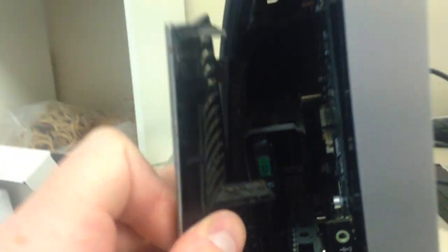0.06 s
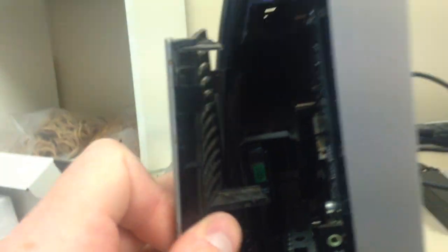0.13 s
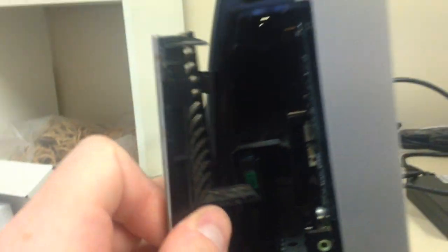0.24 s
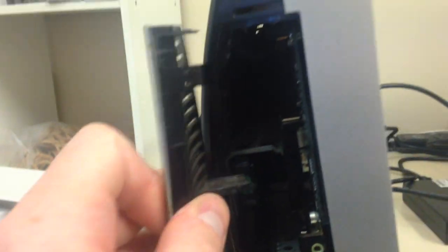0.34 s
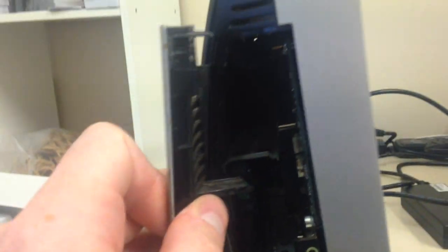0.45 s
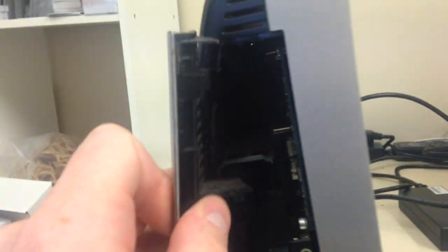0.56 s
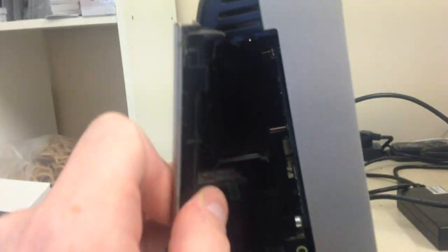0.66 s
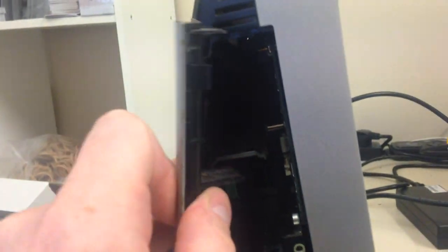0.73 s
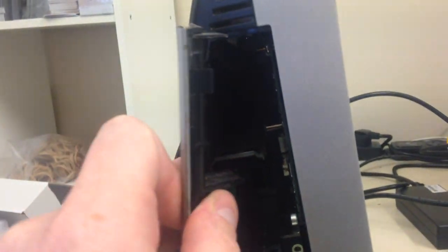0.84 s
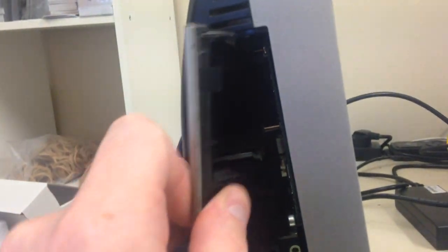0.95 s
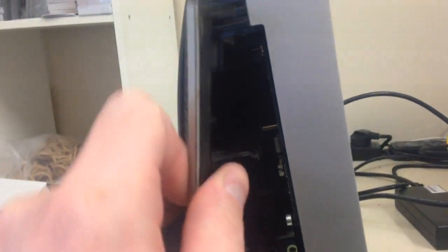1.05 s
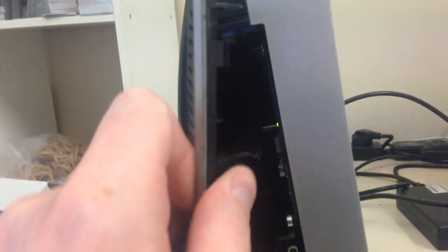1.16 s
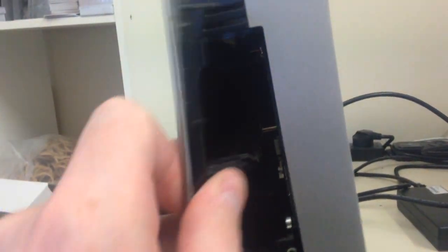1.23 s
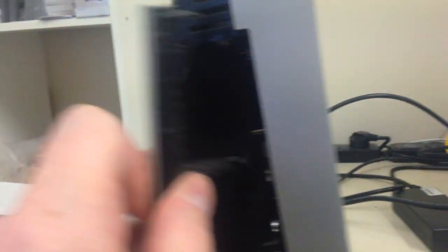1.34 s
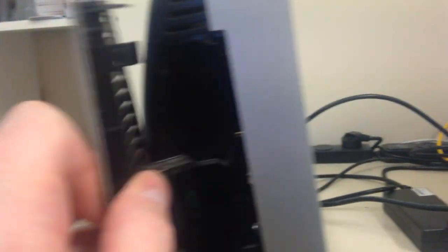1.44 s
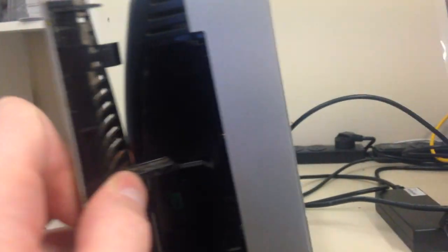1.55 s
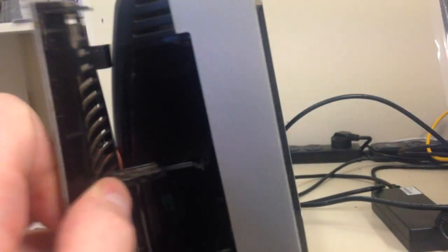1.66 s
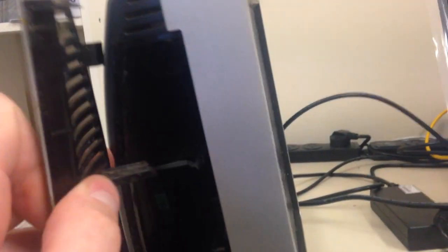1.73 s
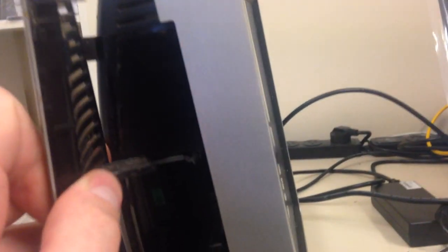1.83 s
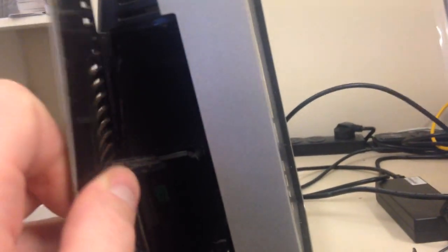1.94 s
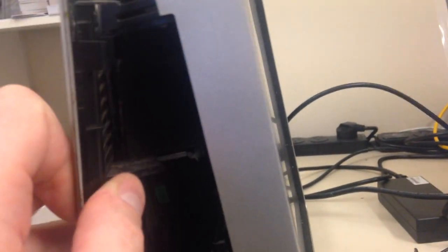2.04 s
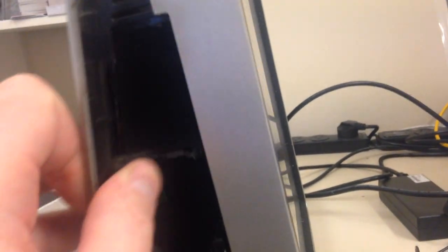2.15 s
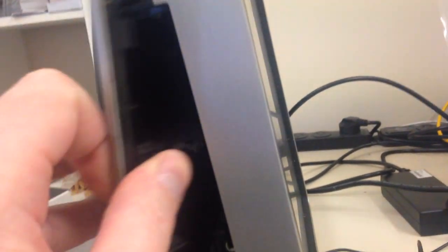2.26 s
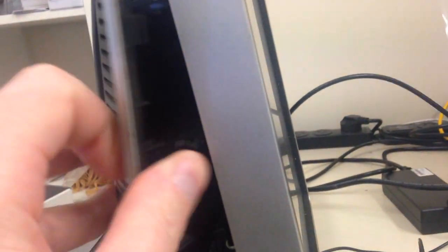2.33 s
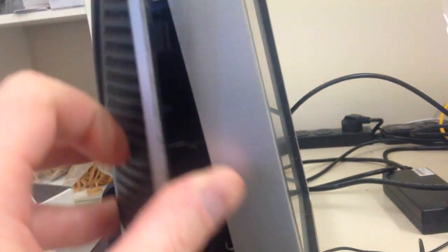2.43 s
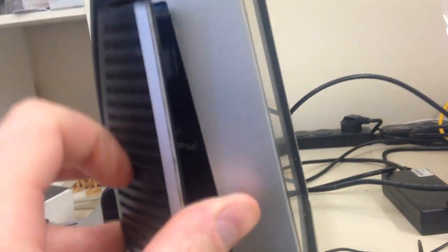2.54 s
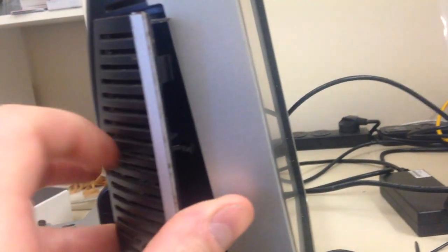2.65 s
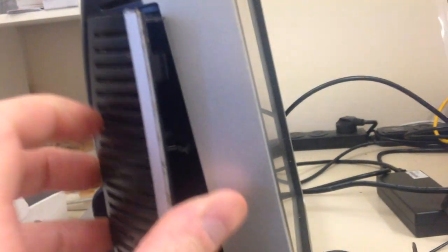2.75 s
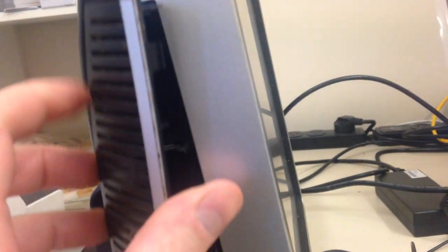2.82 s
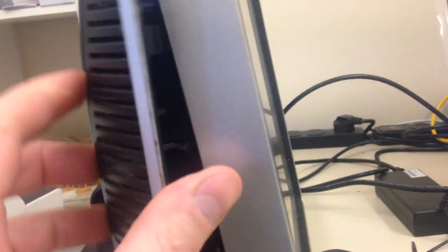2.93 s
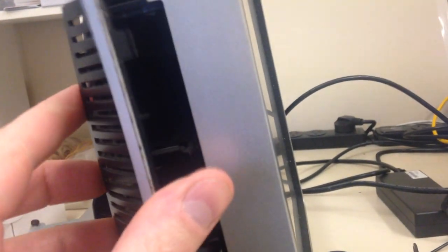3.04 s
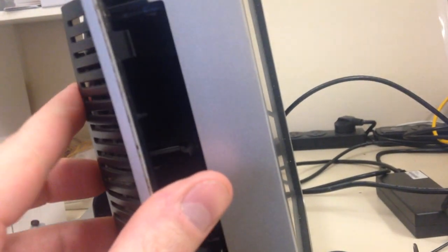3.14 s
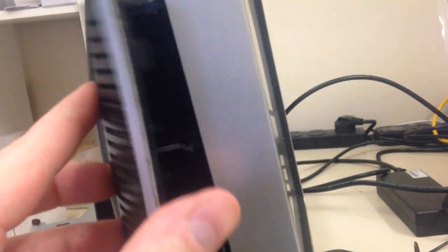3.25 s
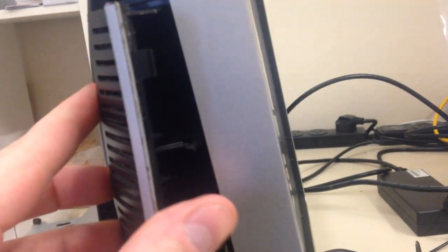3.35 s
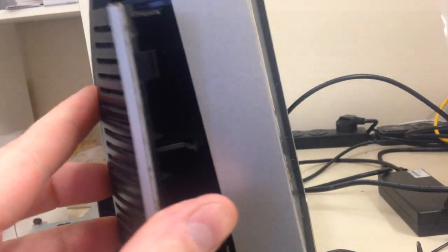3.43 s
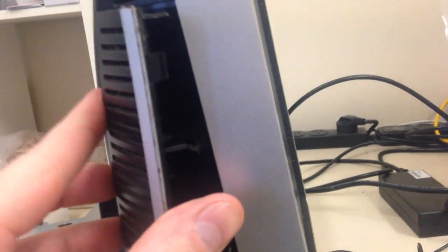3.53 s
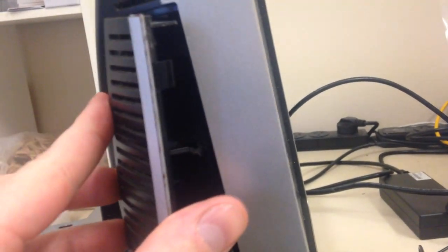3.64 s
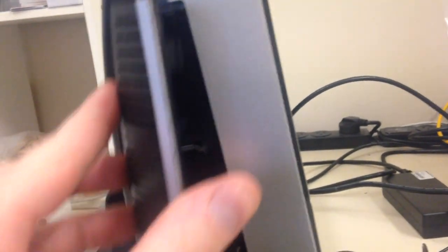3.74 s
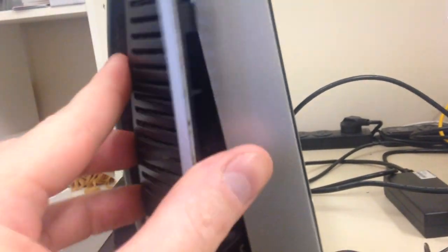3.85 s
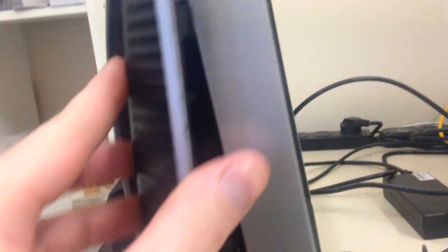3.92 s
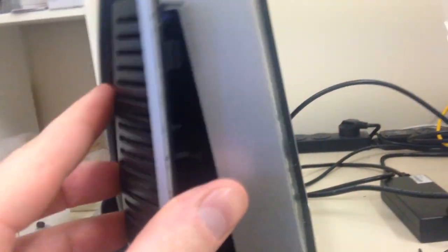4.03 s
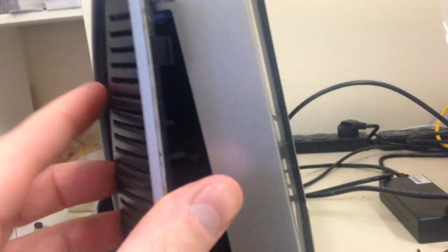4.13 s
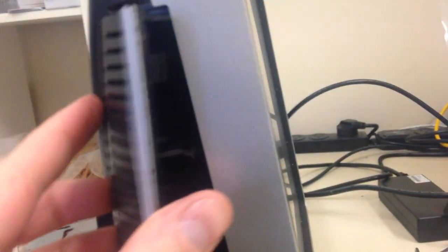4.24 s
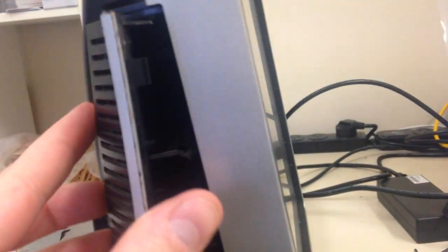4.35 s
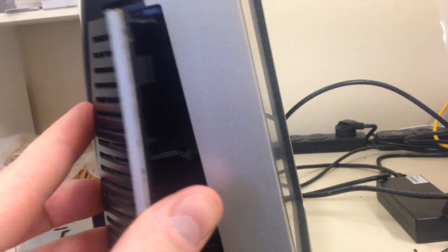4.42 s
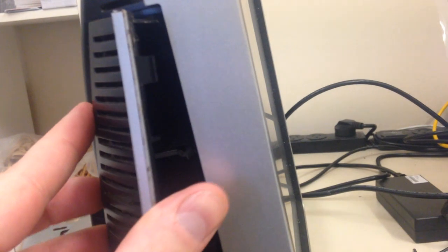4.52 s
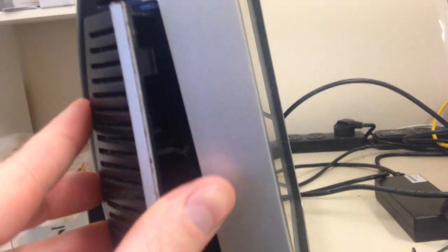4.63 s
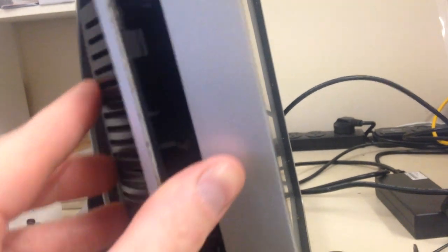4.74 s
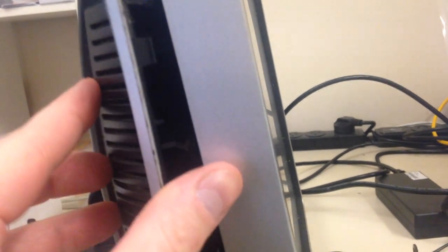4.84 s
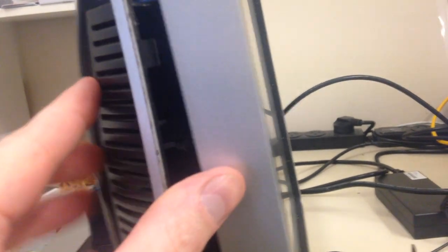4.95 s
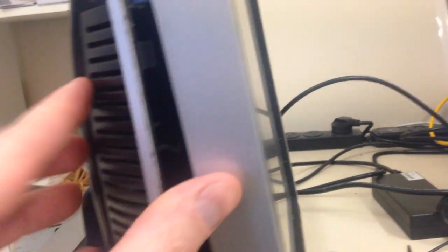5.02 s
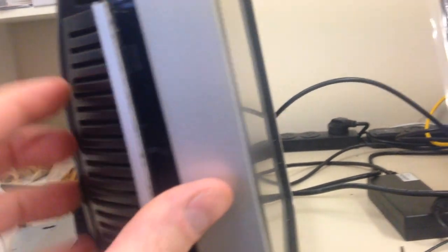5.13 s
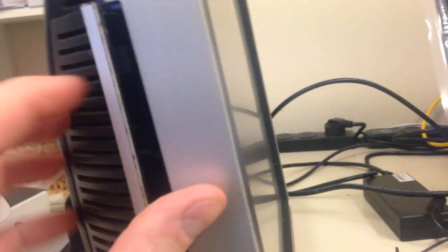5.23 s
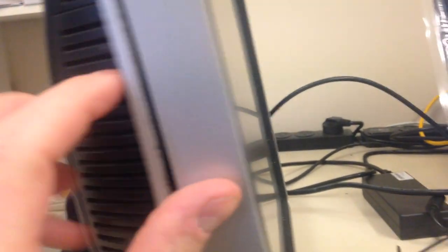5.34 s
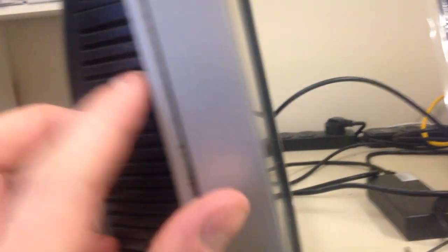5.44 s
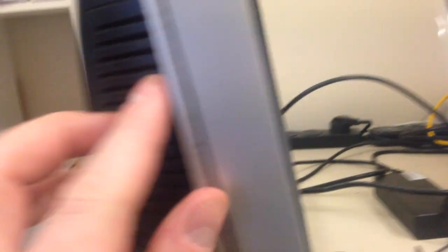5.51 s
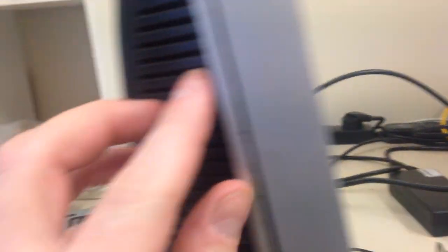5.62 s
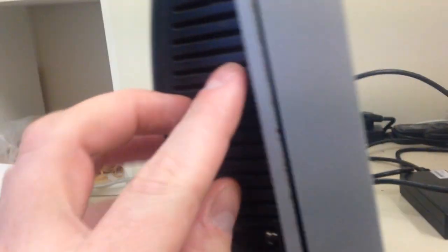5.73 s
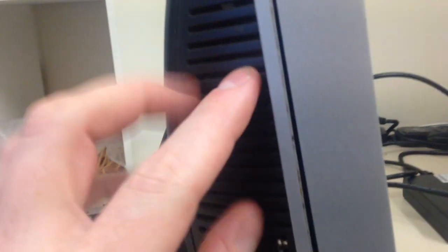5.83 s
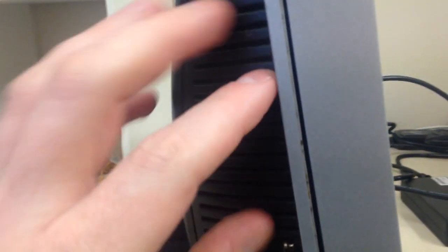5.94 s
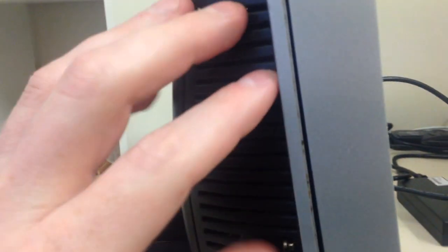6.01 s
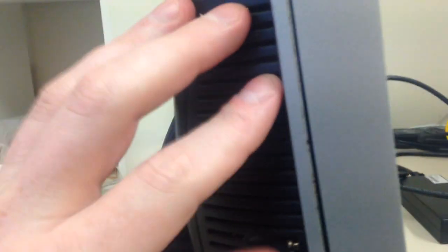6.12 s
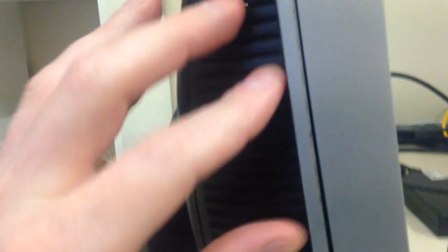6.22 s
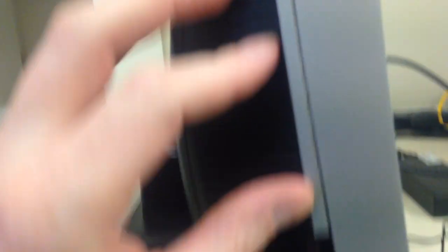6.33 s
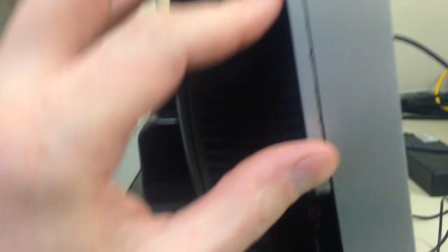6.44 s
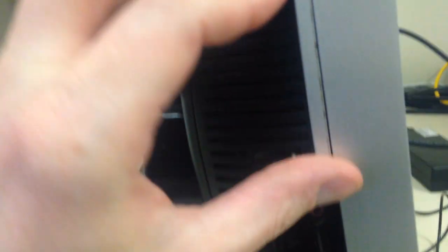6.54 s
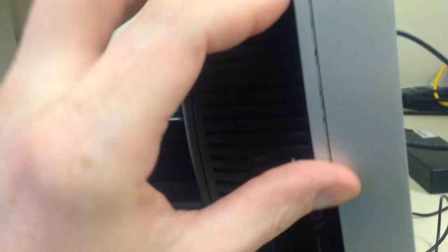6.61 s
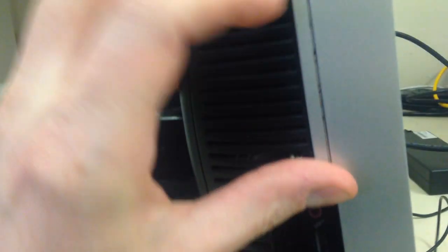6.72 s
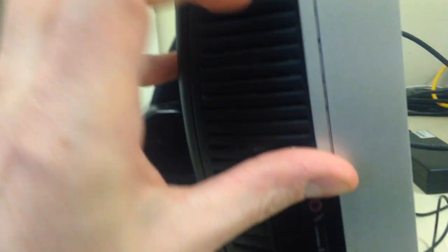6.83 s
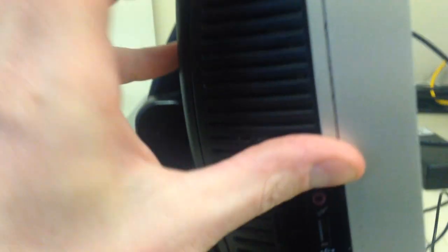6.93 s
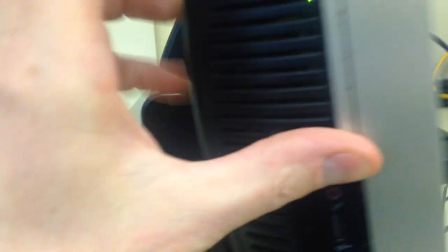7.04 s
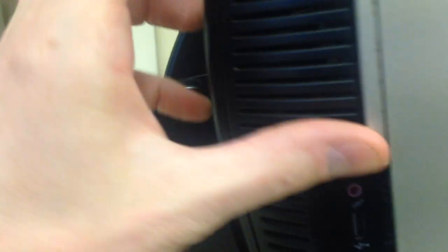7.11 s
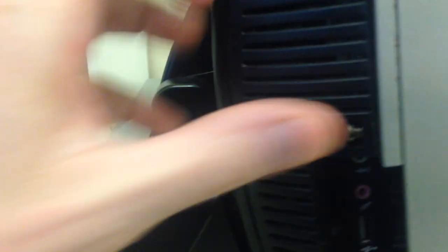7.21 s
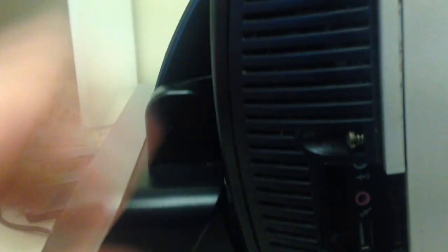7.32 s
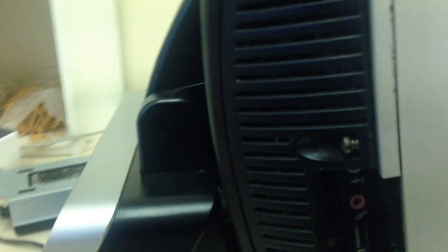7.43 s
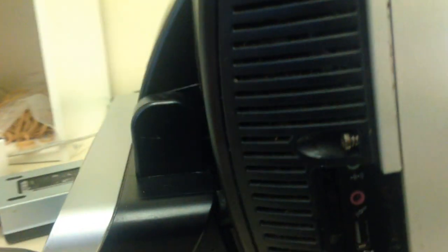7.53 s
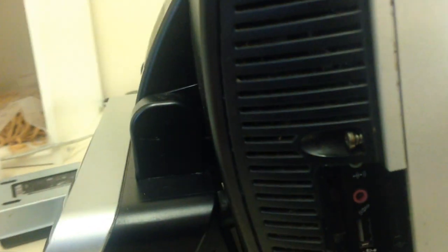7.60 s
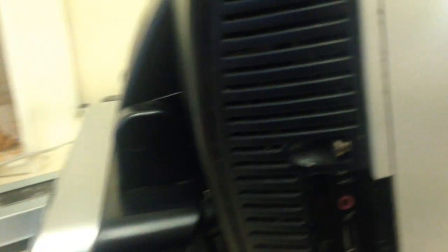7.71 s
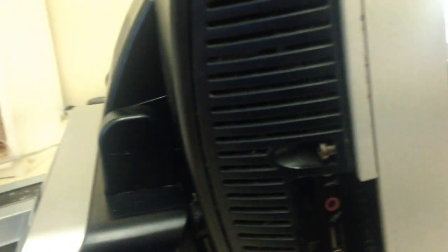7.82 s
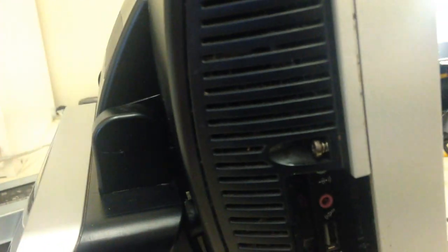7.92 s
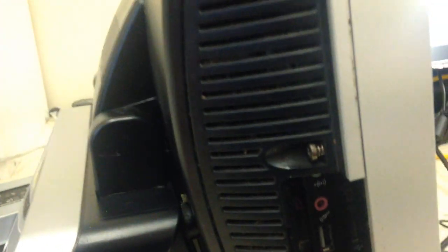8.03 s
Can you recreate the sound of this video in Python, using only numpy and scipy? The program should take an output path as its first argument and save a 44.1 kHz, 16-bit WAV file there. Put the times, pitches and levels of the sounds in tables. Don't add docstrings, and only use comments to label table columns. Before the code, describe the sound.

A light plastic cover is turned, tapped and scraped along the edge of a hollow casing, irregularly, with hollow pocketed clacks and dry skin rubbing. After a sparse, quieter middle, it is pushed in with a strong crack, then crunchy clicks and low casing thumps, a second strong crack, and a few last clicks before it goes quiet. Close handheld microphone, quiet indoor room, slightly reverberant, steady faint fan hum behind.

```python
import sys
import numpy as np
from scipy import signal
from scipy.fft import rfft, irfft, next_fast_len
from scipy.io import wavfile
from scipy.ndimage import uniform_filter1d, map_coordinates

SR = 44100
rng = np.random.default_rng(int(sys.argv[2]) if len(sys.argv) > 2 else 0)


def wrap_up_sound(samples):
    columns = np.atleast_2d(samples).T
    tamed = np.clip(columns, -1, 1)
    steps = np.round(tamed * 32767).astype(np.int16)
    wavfile.write(sys.argv[1], SR, steps)


def nominal_scale(level):
    x = np.asarray(level, float) / 20
    return 10 ** x


N = 355887
HIT = 8192
SEATED_S = 4.2

# shaft_order, level_db, second_motor_share
FAN_HUM = [(1, -57, 0.67), (2, -70, 0.1), (4, -70.5, 0.88)]
# frequency_hz, density_db_per_hz
AIR_NOISE = [(15, -13), (30, -31.5), (62, -21.5), (85, -5.5), (120, -12.5), (250, -24.5), (450, -29),
             (800, -27.5), (1500, -35.5), (3000, -41.5), (5000, -47), (10400, -48), (16000, -51.5)]
# frequency_hz, t60_s
ROOM_DECAY = [(150, 0.51), (1000, 0.5), (4000, 0.33), (12000, 0.23)]
# frequency_hz, gain_db
TO_WALLS = [(550, 1.5), (850, -5.5), (1450, -2), (2500, -3)]
# frequency_hz, gain_db
FAR_THUD = [(250, -34.5), (450, 5.5), (800, 1.5), (2200, -10), (2600, -41)]
# frequency_hz, gain_db
MIC_BAND = [(30, -12), (42, 0), (15250, 0), (15500, -16), (16100, -20), (16500, -90)]

# frequency_hz, width_hz, level_db
PANEL_MODES = [(1280, 20, 0.5), (1470, 19.3, 10), (1770, 81, -8.5), (2029, 27, 7), (2783, 86, -3.5),
               (3076, 54, 7), (3580, 92, -23), (4290, 42, -7), (5240, 110, -13.5), (5890, 30, -4),
               (7630, 33, -14.5)]
# frequency_hz, width_hz, level_db
OPEN_POCKET = [(700, 34, -8), (810, 40, -2), (885, 33, 0)]
# frequency_hz, width_hz, level_db
SHUT_POCKET = [(730, 70, -9), (810, 42, 0), (880, 70, -9)]
# frequency_hz, gain_db
CONTACT_EDGE = [(90, -25.5), (350, -9), (1200, 5), (3000, -2), (5000, -11), (9000, -48.5)]
# frequency_hz, density_db_per_hz
FIZZ = [(2350, -29), (4000, 5.5), (4710, 1), (6040, 4), (13100, -10), (15200, -11), (16000, -30.5)]
# frequency_hz, gain_db
CASING = [(45, -22.5), (90, -7), (200, 6.5), (320, 5), (480, 3), (700, -44.5)]

# time_s, pressure_db, speed_db (as extra fizz)
FINGERS = [(0.0, -66.5, -14), (0.29, -64, -19), (0.76, -74.5, -29), (1.3, -64.5, -21), (1.65, -77, -20),
           (2.49, -70, -8), (2.6, -68.5, -8), (3.14, -73.5, 4), (3.37, -71.5, -11.5), (4.79, -76.5, -5),
           (4.95, -86, -17), (5.21, -76.5, 0), (5.45, -64.5, -16), (5.8, -75.5, -5.5), (6.9, -72, -4.5),
           (7.21, -69.5, -4.5), (7.46, -80, -3), (8.07, -81.5, -16)]
# peak_s, level_db, rise_ms (20 dB), fall_ms (20 dB), brightness_db
SCRAPES = [(0.12, -58, 79, 32, -21.5), (0.482, -51, 120, 47, -21), (0.696, -58.5, 12, 120, -5),
           (1.189, -54, 130, 21, -8), (1.311, -26.5, 22, 12, -12.5), (1.35, -44.5, 3, 87, -21),
           (2.073, -42.5, 11, 29, -23), (2.625, -42, 31, 53, -7), (3.102, -49.5, 83, 16, 1),
           (3.929, -54, 106, 77, -6), (4.08, -59.5, 109, 63, -0.5), (4.783, -46, 11, 24.5, -4.5),
           (4.846, -31, 39.5, 16, -22), (4.929, -30, 4, 6, -8.5), (4.94, -49.5, 2, 90.5, -14.5),
           (5.197, -45.5, 19.5, 1, -15), (5.398, -39, 5, 40, -20), (5.951, -39.5, 11, 14, -11),
           (6.42, -29.5, 3, 13, -7), (6.428, -36, 13, 72, -13), (6.821, -48.5, 18, 92, -9)]
# start_s, length_ms, level_db, pocket_db, brightness_db
DRAGS = [(0.06, 35, -74.5, 24, -14), (2.86, 130, -79, 14, -9), (3.07, 56, -51, 7.5, -9),
         (1.402, 3.9, -67, 1, 7.5), (1.441, 60, -66, 18, -9), (2.429, 146, -72, 3, 0.5),
         (2.721, 103, -69.5, -16, -4), (4.288, 61, -70.5, -8, 1), (4.468, 62, -68.5, 2, -1),
         (2.43, 64, -79, -10, 2.5), (7.44, 28, -68, -16.5, -4)]
# start_s, peak_db, pitch_hz, t60_ms
SLIPS = [(4.7797, -39.5, 7000, 28), (4.787, -39, 6950, 15), (4.807, -42, 9500, 20), (4.816, -46, 11000, 20),
         (4.826, -44, 10000, 16), (4.8352, -30, 11000, 14), (4.8432, -34.5, 6200, 14),
         (4.953, -43, 8000, 14), (4.967, -43, 7200, 12), (1.286, -38, 2800, 30), (1.2987, -34, 11000, 15),
         (1.3, -26.5, 3100, 39), (1.305, -36, 9000, 10), (1.313, -32, 3300, 34), (1.328, -47, 5200, 10),
         (1.393, -50, 8500, 10), (5.1803, -57, 11000, 12), (5.189, -54, 10000, 13), (5.412, -39, 7300, 15),
         (5.444, -42, 9000, 12), (5.4566, -32.5, 13000, 15), (5.5055, -34, 13500, 18),
         (5.524, -42, 10600, 11), (5.532, -38, 3800, 13), (6.4235, -32, 9500, 12), (6.451, -44, 10000, 15),
         (3.905, -51, 9000, 20), (4.0564, -63, 8600, 18), (4.2938, -65, 8100, 15), (2.5794, -51, 6000, 30),
         (2.966, -54, 5900, 40), (3.0264, -56, 6800, 30), (3.3447, -54, 6200, 18), (6.798, -59, 6000, 9.1),
         (6.828, -42, 3600, 18), (4.9315, -21, 1600, 41), (6.4225, -20.5, 1340, 68), (6.449, -28, 1560, 60),
         (4.3976, -32, 11700, 15), (1.309, -25, 14000, 40), (1.7448, -32, 12500, 17),
         (6.128, -34, 12000, 15), (6.064, -51, 1300, 25), (6.096, -51, 1300, 25), (3.025, -51, 2200, 46),
         (1.2, -54, 4600, 15), (4.846, -37, 15000, 20), (6.1, -59, 9000, 12), (2.315, -55, 2000, 30),
         (4.812, -39, 1500, 60),
         (6.743, -29.5, 1440, 25),
    (6.1285, -27.5, 1280, 20),
    (6.926, -34.5, 1860, 30),
    (3.1, -42, 1400, 30),
    (3.928, -46, 2900, 30),
    (4.7, -42, 2560, 33),
]

# start_s, peak_db, pitch_hz
KNOCKS = [(1.174, -45, 257), (1.248, -36.5, 410), (2.035, -47, 325), (3.499, -46.5, 380), (3.949, -40, 298),
          (4.398, -40, 440), (4.515, -44.5, 317), (4.783, -40, 372), (4.846, -25, 423), (4.931, -34, 404),
          (5.193, -35.5, 380), (5.365, -31.5, 377), (5.421, -33, 358), (5.455, -37, 360), (5.947, -41, 457),
          (6.131, -32, 417), (6.311, -43.5, 450), (6.419, -27.5, 406), (6.741, -37.5, 450),
          (6.806, -37, 462), (6.855, -37, 555), (6.93, -31.5, 371), (7.053, -44.5, 390),
          (7.433, -48.5, 327)]
# start_s, peak_db, pitch_hz
ROCKS = [
    (4.933, -41, 131.5),
    (5.412, -44, 95),
    (6.416, -41.5, 180),
    (7.081, -41.5, 76.3),
]
# start_s, peak_db, pitch_hz
BUMPS = [
    (2.637, -43, 347),
    (4.02, -51, 172),
    (5.333, -50, 330),
    (6.378, -41.5, 450),
    (6.44, -30, 404),
    (7.1, -42.5, 406),
    (7.92, -53.5, 496),
    (6.891, -43.5, 750),
]

# start_s, peak_db, pocket_db, brightness_db
FACE_TAPS = [(0.1091, -32.5, -2.5, -17.5), (0.3923, -40.5, -8, -15), (0.4409, -44, 7, -9),
             (0.6983, -44, 6, -18), (0.8981, -27, -8, -14), (1.1345, -54, 18, 0), (1.2476, -25.5, -7, -11),
             (1.3671, -32, -0.5, -3.5), (1.5179, -44.5, -1.5, -24), (1.9973, -38, 0.5, -28),
             (2.6361, -33.5, 0.5, -12), (3.684, -34.5, -29, -13.5), (3.706, -35, -14, -16),
             (3.8801, -40.5, 1.5, -6)]
# start_s, peak_db, pocket_db, brightness_db
PRESSES = [(4.555, -39.5, -6.5, -20), (4.8084, -36, 5, -22), (4.847, -19.5, -2.5, -13),
           (5.1941, -24, 1, -15), (5.4205, -23, -6.5, -8), (5.502, -58, -22, 20),
           (5.5254, -28.5, -4.5, -9.5), (6.1281, -25.5, -3, -2), (6.2886, -37, -3, -8),
           (6.422, -10, -9.5, -4), (6.656, -50, -24, 0.5), (6.6765, -46, -28, -16.5),
           (6.8267, -42, -24, -18.5), (6.854, -30, -1, -3.5), (6.9253, -23, -3.5, -17),
           (6.9332, -20.5, -15, -14), (7.0575, -29.5, -12, -13.5)]
# start_s, peak_db, pocket_db, brightness_db
CLIPS = [(0.031, -34.5, -23, -7), (0.3336, -45, -6, -6), (0.4714, -57, 2, -14), (0.7622, -32.5, -7, -14.5),
         (1.2814, -36.5, 10, -19.5), (1.292, -21, -11, -22), (2.6162, -29, -4, -12),
         (3.548, -29.5, -10.5, -16.5), (4.9305, -7.5, -9, -15), (5.9529, -33.5, 1.5, -15),
         (6.3124, -34, -3, -18), (6.4704, -23, -24, -7), (6.7428, -23, -2.5, -19.5), (6.797, -46, 7, -18),
         (6.8065, -26.5, 3, -4), (7.0384, -41, -15, -14), (7.093, -40.5, -3, -6.5), (7.1351, -24, -4, 0.5),
         (7.436, -53.5, -16, 0)]
# start_s, peak_db, pocket_db, brightness_db
RIM_TICKS = [(0.4914, -46, 2, -6), (0.5681, -46.5, -19, -2), (1.0812, -45, -8, -6), (1.1783, -37, -7, -2.5),
             (1.3069, -25, -13, -11), (1.5519, -43, -1, -9), (1.7448, -22.5, -4.5, -6.5),
             (2.0356, -41.5, -2, -6.5), (2.144, -30, -5, -12), (2.238, -48.5, 0, -4),
             (3.0964, -22, -5, -44), (3.1574, -24, -5.5, -16.5), (3.3568, -41.5, -9, -3.5),
             (3.4996, -34.5, 0, -11), (3.9235, -35.5, -6, -2), (3.942, -30, -24, -12),
             (4.3047, -43, -36, -12.5), (4.3824, -47, -6, -10), (4.3972, -34.5, -5, 0),
             (4.467, -40, -11, -8.5), (5.3275, -34.5, -5.5, -3.5), (5.3647, -24, -19, -4),
             (5.395, -20.5, -34, -5), (5.4114, -18.5, -24, -24), (5.4583, -23, -10.5, -15),
             (6.5009, -23, 4, 0.5), (7.1253, -42, -27, 4)]
CORNER_TAPS = [
    .898,
    1.135,
    2.144,
    3.548,
]


def unit(x):
    return x / np.sqrt(np.mean(x ** 2, axis=-1, keepdims=True) + 1e-20)


def peak_one(x):
    return x / np.abs(x).max(axis=-1, keepdims=True)


def along(points, hz):
    f, v = np.transpose(points)
    return nominal_scale(np.interp(np.log(hz + 1), np.log(f + 1), v))


def wobble(rate):
    knots = rng.standard_normal(int(N * rate / SR) + 4)
    return map_coordinates(knots, [np.arange(N) * rate / SR])


def filtered(x, response):
    m = next_fast_len(x.shape[-1] + 2048)
    return irfft(rfft(x, m) * response(np.fft.rfftfreq(m, 1 / SR)), m)[..., :x.shape[-1]]


def modes(table, luck=np.zeros((1, 16, 2)), scatter_db=0, detune=0, damping=1):
    def response(f):
        total = 0
        for k, (centre, width, db) in enumerate(table):
            strength = (-1) ** k * nominal_scale(db + scatter_db * luck[:, k, :1])
            shifted = centre * (1 + detune * luck[:, k, 1:])
            loss = 1j * f * width * damping
            total = total + strength * loss / (shifted ** 2 - f * f + loss)
        return total
    return response


def broad_resonance(hz, width):
    def response(f):
        loss = 1j * f * hz * width
        return (loss / (hz ** 2 - f * f + loss)) ** 2
    return response


def placed(s, rows):
    at = np.round(s * SR).astype(int) + np.arange(rows.shape[1])
    return np.bincount(at.ravel(), rows.ravel(), N + HIT)[:N]


def patchy(x, depth_db):
    z = signal.stft(x, nperseg=512)[2]
    field = uniform_filter1d(rng.standard_normal(z.shape), 8, 0)
    field = uniform_filter1d(field, 6, 1)
    return signal.istft(z * nominal_scale(depth_db * field / field.std()), nperseg=512)[1][:N]


def fans():
    t = np.arange(N) / SR
    shaft = 2 * np.pi * 48.15 * t
    lag = 2 * np.pi * (t - 2.58) / 1.92
    hum = 0
    for k, db, share in FAN_HUM:
        motors = np.sin(k * shaft) + share * np.sin(k * (shaft + lag))
        hum = hum + nominal_scale(db + 1.3 * k ** .5 * wobble(6.4)) * motors
    air = unit(filtered(rng.standard_normal(N), lambda f: along(AIR_NOISE, f)))
    return hum + nominal_scale(-60.5 + 0.58 * wobble(1.615) + 0.75 * wobble(9.3)) * air


def far_thud():
    after = np.arange(N) / SR - 7.755
    puff = unit(filtered(rng.standard_normal(N), lambda f: along(FAR_THUD, f)))
    return nominal_scale(-52.5 - 60 * np.clip(after, 0, 1) / 0.45) * (after > 0) * puff


def room(x):
    f, t60 = np.transpose(ROOM_DECAY)
    hz, t, z = signal.stft(rng.standard_normal((3, SR // 2)), SR, nperseg=256)
    decay = nominal_scale(-60 * t / np.interp(hz, f, t60)[:, None])
    tails = signal.istft(z * decay, SR, nperseg=256)[1]
    tails = tails / np.linalg.norm(tails[0])
    turn = np.arange(N) // (SR // 3) % 3 == np.arange(3)[:, None]
    wet = signal.fftconvolve(x * turn, tails, axes=1).sum(axis=0)
    return np.pad(wet, (250, 0))[:N]


def slide_whistle():
    end_s, fade_s = 0.47, .11
    t = np.arange(N) / SR
    band = unit(filtered(rng.standard_normal(N), modes([(4300, 230, 0)]))[0])
    return nominal_scale(-75 - 20 * np.clip((t - end_s) / fade_s, 0, 10) + 1.4 * wobble(19)) * band


def rub(level_db, pocket_db, bright_db, rumble_db, grain_db, clump_db, patch_db):
    grains = rng.standard_normal(N) * nominal_scale(grain_db * wobble(700))
    grains /= np.sqrt(np.abs(uniform_filter1d(grains ** 2, size=1200)) + 1e-9)
    grains = unit(patchy(grains, patch_db) * nominal_scale(clump_db * wobble(40)))

    def voices(f):
        panel = modes(PANEL_MODES, damping=2.5)(f)[0] + nominal_scale(-3) * along(CONTACT_EDGE, f)
        return [panel, modes(OPEN_POCKET)(f)[0], along(FIZZ, f), along(CASING, f)]

    scale = np.std(filtered(rng.standard_normal(N), voices), axis=1, keepdims=True)
    gains = nominal_scale(np.array([level_db, pocket_db, bright_db, rumble_db]))
    return np.sum(filtered(grains * gains, voices) / scale, axis=0)


def finger_slides():
    t = np.arange(N) / SR
    s, pressure_db, speed_db = np.transpose(FINGERS)
    pressure, speed = np.interp(t, s, pressure_db), np.interp(t, s, speed_db)
    rumble = pressure + 4 + 3.5 * (t > SEATED_S + 1)
    return rub(pressure, pressure - 2, pressure + speed, rumble, grain_db=4.5, clump_db=3.5, patch_db=4)


def strokes(t):
    drag_edge_ms = 8.2
    rows = []
    for s, db, rise, fall, bright in SCRAPES:
        pocket = -0.5 if s > SEATED_S else 4
        pocket -= 0.24 * max(db + 39.0, 0)
        rows.append((s, 0, db, rise, fall, pocket, bright))
    for s, hold, db, pocket, bright in DRAGS:
        rows.append((s, hold, db, drag_edge_ms, drag_edge_ms, pocket, bright))
    s, hold, db, rise, fall, pocket, bright = np.transpose(rows)[:, :, None]
    ms = np.arange(round(t[-1] * 1000) + 2)
    after = ms - 1000 * s
    slope = np.maximum(-after / np.abs(rise), (after - hold) / np.abs(fall))
    level = db - 20 * np.maximum(slope, 0)
    curves = []
    for extra in (0, pocket, bright):
        total_db = 20 * np.log10(nominal_scale(level + extra).sum(axis=0) + 1e-5)
        curves.append(np.interp(t, ms / 1000, total_db))
    return curves


def scrapes():
    t = np.arange(N) / SR
    level, pocket, bright = strokes(t)
    rumble = level - np.where(t > SEATED_S, 11, 22)
    return rub(level, pocket, bright, rumble, grain_db=4.5, clump_db=1.5, patch_db=2)


def knocks(rows, t60_s):
    s, db, hz = np.transpose(rows)[:, :, None]
    t = np.arange(HIT) / SR
    envelope = nominal_scale(-60 * t / np.clip(t60_s, .01, .3)) * (1 - np.exp(-t / 0.0011))
    push = rng.standard_normal((len(s), HIT)) * envelope
    return placed(s, nominal_scale(db + 1.0) * peak_one(filtered(push, broad_resonance(hz, 0.46))))


def slips():
    s, db, hz, t60_ms = np.transpose(SLIPS)[:, :, None]
    t = np.arange(2048) / SR
    envelope = nominal_scale(-60000 * t / np.clip(t60_ms, 3, 60)) * (1 - np.exp(-t / 0.00055))
    burst = rng.standard_normal((len(s), len(t))) * envelope
    return placed(s, nominal_scale(db) * peak_one(filtered(burst, broad_resonance(hz, 0.55))))


def contacts():
    # chatter_ms, region_hz (loudest panel region)
    kinds = [(FACE_TAPS, (7.8, 1040)), (PRESSES, (5.1, 1510)), (CLIPS, (3.8, 1800)), (RIM_TICKS, (7.4, 3400))]
    hits = sorted(tuple(row) + kind for rows, kind in kinds for row in rows)
    s, db, pocket_db, bright_db, chatter_ms, region_hz = np.transpose(hits)[:, :, None]
    t = np.arange(HIT) / SR
    seated = s > SEATED_S
    luck = rng.standard_normal((len(s), 2, 16, 2))
    noise = rng.standard_normal((len(s), 3, HIT))

    fade_ms = np.clip(chatter_ms * (1 - 0.021 * np.maximum(db + 28.5, 0)), .3, 30)
    fade = np.exp(-1000 * t / fade_ms) * (1 - np.exp(-t / 0.000091))
    chatter = noise[:, 0] * nominal_scale(4.6 * noise[:, 1]) * fade
    chatter = chatter + seated * nominal_scale(12) * (np.arange(HIT) == 8)

    plate = modes(PANEL_MODES, luck[:, 0], scatter_db=2.5, detune=.008, damping=np.where(seated, 7, 1.1))

    def panel_response(f):
        highpass = (f / (f - 180j)) ** 2
        favoured = 1j * f * region_hz * 0.39 / (region_hz ** 2 - f * f + 1j * f * region_hz * 0.4)
        return highpass * (nominal_scale(-2.5) + favoured) * (plate(f) + nominal_scale(-2.0) * along(CONTACT_EDGE, f))

    panel = peak_one(filtered(chatter, panel_response))

    def fizz_response(f):
        return along(FIZZ, f) * (f / 8000 + 1e-3) ** (0.11 * (bright_db + 7.0))

    fizz = peak_one(filtered(noise[:, 1] * fade ** 1.26, fizz_response) * (t < .05))

    dying = noise[:, 2] * nominal_scale(-60 * t / np.where(seated, .16, .1)) * (1 - np.exp(-t / 0.0025))
    dull_hz = np.where(seated, 2500, 3500)
    crunch = peak_one(filtered(dying, lambda f: along(CONTACT_EDGE, f) / (1 + (f / dull_hz) ** 2)))

    push = filtered(chatter * np.where(seated, fade, 1), lambda f: 1 / (1 + 1j * f / 900))
    near_corner = np.abs(s - CORNER_TAPS).min(axis=1) < .005
    luck[:, 1, 0, 0] += 6 * near_corner
    loose_air = modes(OPEN_POCKET, luck[:, 1], scatter_db=2.5, detune=.005)
    shut_air = modes(SHUT_POCKET, luck[:, 1], scatter_db=2, detune=.01)
    pocket = peak_one(filtered(push, lambda f: np.where(seated, shut_air(f), loose_air(f))))

    mix = panel + nominal_scale(bright_db + 4) * fizz + nominal_scale(pocket_db) * pocket
    mix = mix + nominal_scale(np.where(seated, -14, -19)) * crunch
    return placed(s, nominal_scale(db - 5.5) * mix)


def scene():
    panel = finger_slides() + scrapes() + knocks(KNOCKS, t60_s=0.065) + knocks(ROCKS, t60_s=0.35) + contacts()
    walls = patchy(room(filtered(panel, lambda f: along(TO_WALLS, f))), depth_db=1.5)
    background = fans() + far_thud() + slide_whistle()
    close = knocks(BUMPS, t60_s=0.15) + slips()
    return (background + nominal_scale(-11.5) * walls + panel + close)[None]


def top_cut(x):
    return signal.sosfilt(signal.butter(12, 16520, fs=SR, output="sos"), x)


def record(dry):
    mix = filtered(dry, lambda f: along(MIC_BAND, f))
    return top_cut(mix)


dry = scene()
out = record(dry)
wrap_up_sound(out)
```